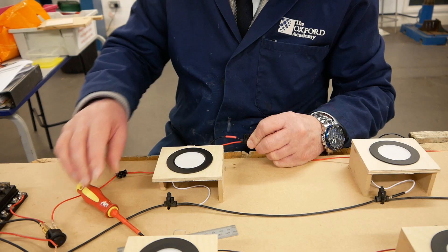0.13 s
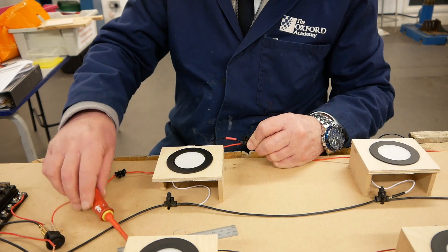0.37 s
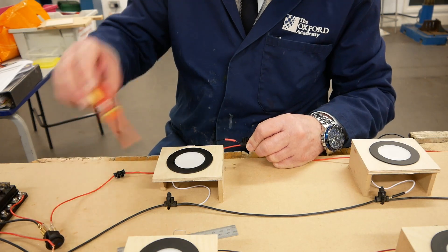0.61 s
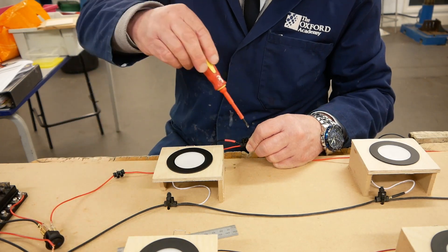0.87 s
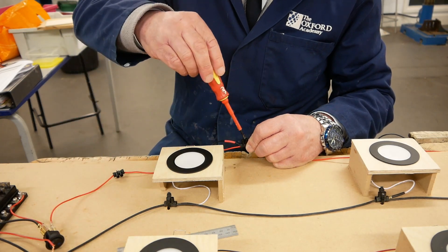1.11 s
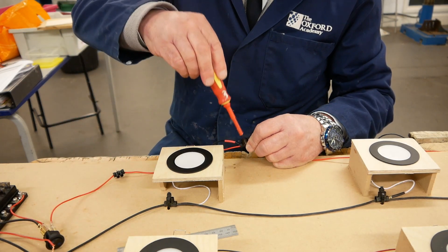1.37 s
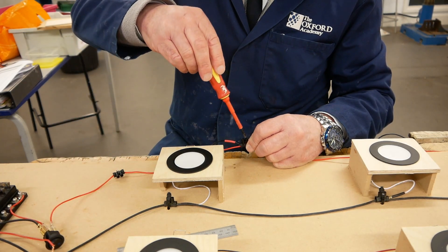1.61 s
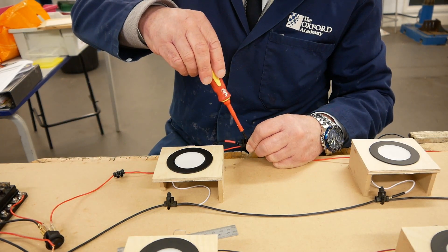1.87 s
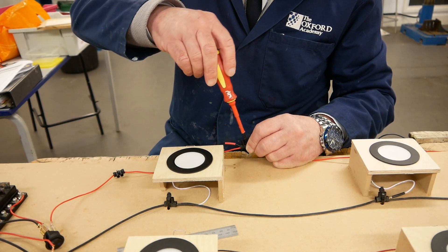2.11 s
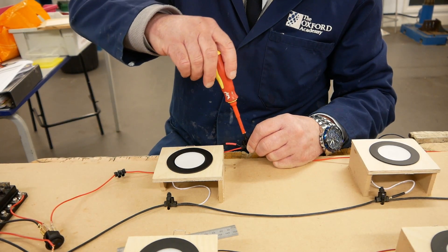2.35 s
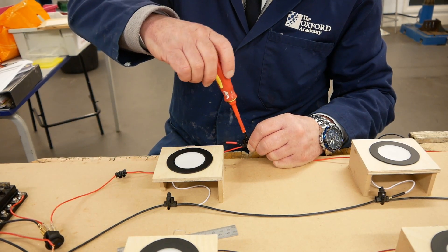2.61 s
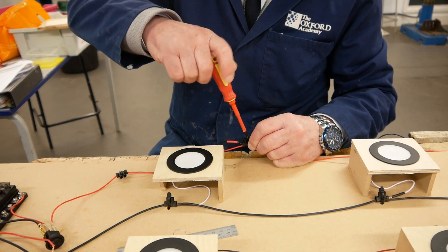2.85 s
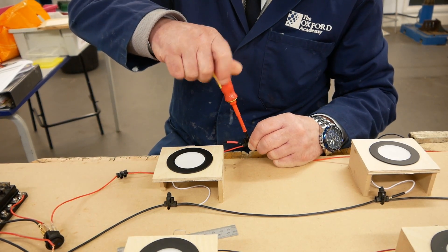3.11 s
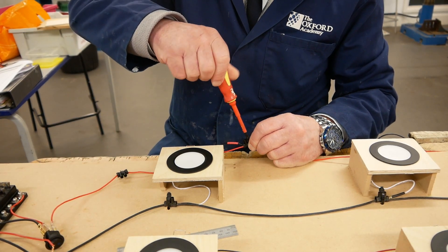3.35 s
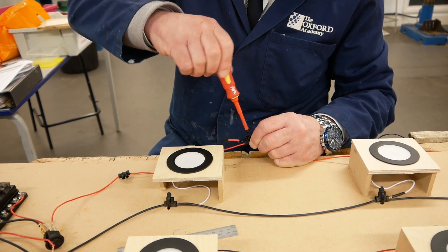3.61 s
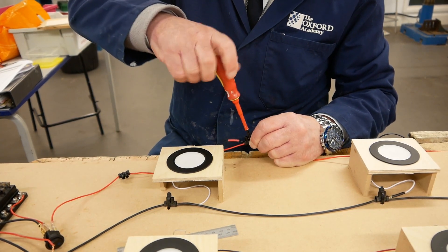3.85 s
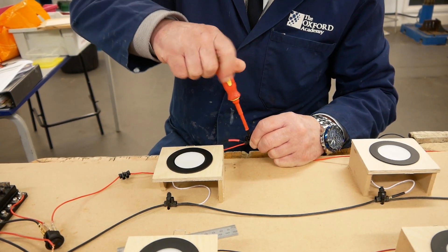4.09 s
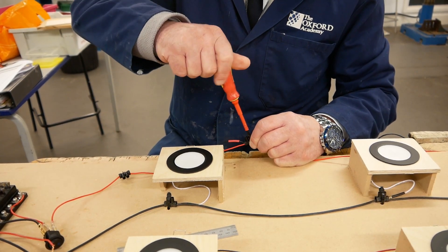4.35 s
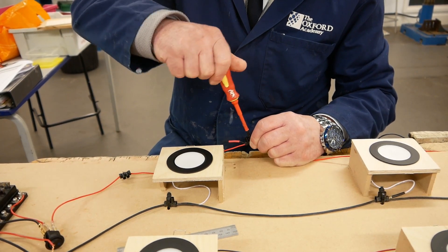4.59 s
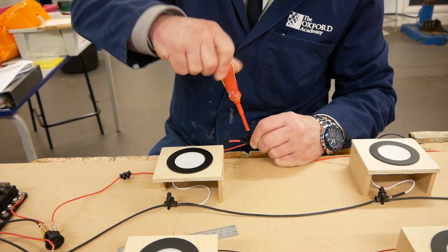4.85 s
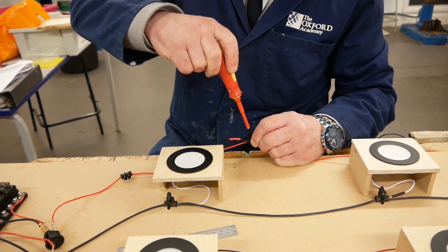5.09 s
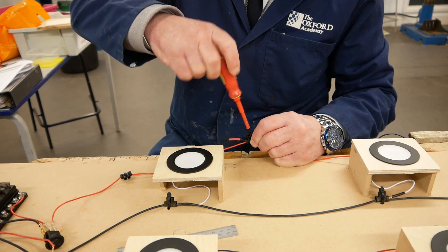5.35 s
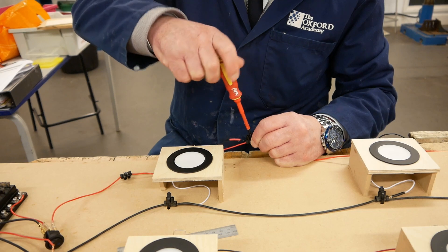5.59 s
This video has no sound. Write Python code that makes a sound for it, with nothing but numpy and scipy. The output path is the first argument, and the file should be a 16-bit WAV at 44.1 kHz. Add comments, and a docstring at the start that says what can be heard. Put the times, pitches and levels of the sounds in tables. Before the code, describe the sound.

A quiet workshop hall, heard close and almost mono: soft ventilation rush, faint low hum and steady fine hiss. At 0 s cloth rustles and a forearm leans lightly on the board. Around 0.33 s a screwdriver drags with a short gritty scrape, gives a sharp plastic knock at 0.39 s and a bright steel-and-plastic clack at 0.47 s with a brief rattle, the loudest events. Sleeves rustle until about 1 s, then fade. A small click comes near 1.15 s and a brighter steel tick at 1.36 s, with tiny touches at 1.85 s. From 2.1 s fingers rub the handle in short dry swishes, with irregular faint clicks and ticks as the screw turns, a duller wooden tap at 3.3 s, and soft clicks through 4-5 s. Slightly clearer plastic clicks land at 5.36 and 5.66 s. Deep, barely audible bench sway swells underneath, strongest near the end. Reflections are short.

```python
"""Screwdriver at a workbench

A screwdriver is dragged off a wooden board and lifted, set into a plastic connector block and turned.
Each contact rings plastic, bench and steel as sets of fading tones; the drag is rough grains shaking them.
Fingers slide on the handle (swells of hiss), sleeves rustle (fluttering noise) and arms make the board murmur.
A quiet hall rushes and hums behind (shaped noise) and the bench sways deeply (very low resonances).
The room adds echoes and a short tail; the sound is nearly mono, with a steady hiss on each side."""
import sys
import numpy as np
from scipy import signal
from scipy.fft import rfft, irfft, next_fast_len
from scipy.io import wavfile
from scipy.ndimage import uniform_filter1d, map_coordinates

SR = 44100
rng = np.random.default_rng(int(sys.argv[2]) if len(sys.argv) > 2 else 0)


def unload_wav(signal):
    """Save mono or channel-first audio to the path in sys.argv[1] as 16-bit WAV at rate SR, clipped to [-1, 1]."""
    wavfile.write(
        sys.argv[1],
        SR,
        np.round(np.clip(np.atleast_2d(signal).T, -1, 1) * 32767).astype(np.int16),
    )


def voltage_ratio(decibels):
    """Convert decibels (scalar or array-like) to amplitude ratios, 20 dB per decade."""
    exponent = np.asarray(decibels, float) / 20
    return 10 ** exponent


N = 252163  # length in samples

# Touches of the tool. Each row: start in seconds, then levels in dB of plastic, first bench blow, steel tip.
CONTACTS = [(0.0776, -57, -41.5, -64), (0.3863, -17, -39, -30), (0.4364, -30.5, -62, -62),
            (0.4668, -23, -31, -13), (0.8498, -50, -45.5, -66), (1.1472, -39.5, -59, -59),
            (1.3648, -34.5, -50, -20), (1.8432, -40, -61, -58), (1.8509, -44, -62, -56),
            (2.2507, -37.5, -47, -40), (2.3487, -45, -36, -58), (2.4838, -51, -51.5, -69),
            (2.8047, -45, -52.5, -62), (2.8841, -57, -53, -61), (2.9245, -47, -60, -66),
            (3.2116, -40, -67, -80), (3.2474, -44, -50.5, -65), (3.3208, -39, -32, -66),
            (3.3662, -44, -80, -56), (3.5721, -38, -57, -71), (3.7698, -53, -45.5, -67),
            (3.8649, -34.5, -50, -58), (4.1769, -38, -46.5, -58), (4.4667, -33.5, -48.5, -64),
            (4.612, -40, -52, -54), (4.633, -45, -62, -46), (4.8821, -45, -55, -48.5),
            (5.0557, -74, -54.5, -59), (5.1949, -43, -59, -43), (5.3582, -28, -54, -64),
            (5.48, -41, -62, -62), (5.5307, -44, -62, -62), (5.6555, -29, -54, -68)]
# Fingers sliding on the handle. Each row: loudest moment in seconds, time from there to 28 dB down
# in seconds, hiss level in dB, level of the duller rub in dB over the hiss.
SLIDES = [(2.143, 0.045, -76.5, 11), (2.246, 0.0058, -69.5, 21), (2.761, 0.076, -70, 9.5),
          (2.824, 0.03, -75.5, 17), (2.897, 0.018, -63.5, -1), (2.947, 0.02, -70, 2.5),
          (3.088, 0.041, -71, 12), (3.2, 0.018, -67, -1), (3.238, 0.021, -69, -4),
          (3.467, 0.022, -66.5, -11), (3.868, 0.027, -63.5, -16), (4.072, 0.052, -73, 7.0),
          (4.173, 0.028, -66, 5.0), (4.377, 0.029, -59, 0.5), (4.465, 0.03, -72, 6),
          (4.619, 0.051, -71, 13.5), (4.681, 0.045, -67.5, 2), (4.774, 0.044, -68, 7.5),
          (4.94, 0.049, -76, 14.5), (5.061, 0.025, -65, 4), (5.148, 0.018, -73, 3), (5.25, 0.048, -63.5, 6),
          (5.351, 0.026, -63, -1), (5.537, 0.046, -69.5, 9), (5.645, 0.019, -66.5, 6.5)]
# The handle scraping the board, jerking free, then rattling after its knock. Each row: start in seconds,
# time until the fade in seconds, then levels in dB of board, grit in the handle, thump of the frame.
SCRAPES = [(0.331, 0.062, -46, -48, -67), (0.383, 0.021, -39.5, -43, -49.5),
           (0.467, 0.0069, -39, -62, -56.5)]
# How the wooden board rings. Each row: pitch in Hz, width in Hz, strength in dB.
BENCH_MODES = [(535, 117, -0.5), (708, 52, 2), (852, 68, 2.5), (1109, 102, -2), (1380, 240, -10.5)]
# How the bench legs ring. Each row: pitch in Hz, width in Hz, strength in dB.
FRAME_MODES = [(59.4, 12, 4), (146, 36, 2), (313, 120, -15)]
# How the plastic connector block rings. Each row: pitch in Hz, width in Hz, strength in dB.
BLOCK_MODES = [(1144, 180, 2), (1864, 340, 1.5), (2500, 1270, 5.5), (3530, 400, 1), (4530, 240, -7)]
# How the plastic handle rings. Each row: pitch in Hz, width in Hz, strength in dB.
HANDLE_MODES = [(1880, 1400, -1), (2860, 320, 7), (2900, 360, 0.5), (3600, 1100, 3), (4400, 610, 4),
                (5500, 300, -16), (7040, 280, -25)]
# How the steel tip rings. Each row: pitch in Hz, width in Hz, strength in dB.
TIP_MODES = [(2096, 256, -5.5), (3110, 160, -7.5), (3734, 186, -8), (4700, 930, 9), (6530, 710, 5.5),
             (7820, 200, -15), (8660, 400, -9.5), (11260, 720, -5.5), (12560, 770, -12)]
# Tone colour of skin on plastic. Each row: frequency in Hz, relative level in dB.
SKIN_COLOUR = [(3000, -31), (5000, -1.5), (8000, -9), (11000, -1), (13000, -6), (16000, -28)]
# Tone colour of cloth, also of the dull finger rub. Each row: frequency in Hz, relative level in dB.
CLOTH_COLOUR = [(300, -59), (700, 2), (1100, -3), (1600, -7), (2800, -0.5), (4500, -7.5), (7000, -15),
                (12000, -20.5)]
# How busily the arms move. Each row: time in seconds, cloth level in dB before its flutter.
EFFORT = [(0, -61.5), (.2, -63), (.85, -63.5), (1.2, -68.5), (1.7, -74), (1.95, -90), (2.1, -65.5),
          (2.3, -65.5), (2.7, -72.5), (2.9, -69), (3.3, -65.5), (4.7, -65), (4.92, -66.5), (5.37, -64),
          (5.72, -66)]
# A forearm leans on the board. Each row: loudest moment in seconds, time from there to 28 dB down
# in seconds, level in dB before its wobble.
LEANS = [(0.016, 0.22, -66.5), (0.337, 0.12, -62.5), (0.87, .25, -79), (1.295, 0.37, -73.5),
         (3.202, .2, -69.5), (3.933, 0.32, -66), (5.08, 0.042, -61.5), (5.234, 0.11, -62),
         (5.384, 0.15, -69), (5.68, 0.11, -68)]
# Pushes that sway the bench. Each row: moment the sway peaks in seconds, level there in dB.
PUSHES = [(.74, -59), (1.96, -65), (2.37, -63.5), (2.78, -60), (3.08, -53.5), (3.4, -62), (3.6, -54.5),
          (3.87, -52), (4.14, -57), (4.46, -51.5), (4.97, -53), (5.25, -54), (5.66, -45)]
# Tone colour of the hall's air. Each row: frequency in Hz, relative level in dB.
HALL_COLOUR = [(15, -33), (30, -1), (70, -4.5), (150, -3), (300, -8), (450, -8.5), (800, -4), (1100, -9.5),
               (1500, -18.5), (3000, -20.5), (6000, -31), (16000, -33)]
# Steady hums of the hall. Each row: pitch in Hz, level in dB, width of each of two resonances in Hz.
HUMS = [(68.1, -74.5, 3.7), (306.7, -75, 14.6), (13700, -106, 6.6)]
# Echoes off near surfaces. Each row: delay in seconds, level in dB before absorption.
ECHOES = [(.0012, -19.5), (.0028, -16), (0.0091, -12), (.017, -24)]
# How long the room's tail lasts. Each row: frequency in Hz, time to fall by 60 dB in seconds.
REVERB_TIME = [(200, 0.29), (1000, 0.17), (4000, 0.22), (12000, 0.11)]
# What the walls give back. Each row: frequency in Hz, gain in dB.
WALL_GAIN = [(300, 2), (4000, -5.5), (7000, -16.5), (14000, -9)]
# Side smear: a faint noisy left-right difference that follows the sound's level.
# Each row: frequency in Hz, side level over the middle in dB.
SIDE_SMEAR_DB = [(20, -41), (300, -34), (700, -33.5), (2000, -27), (6000, -25), (16000, -22)]
# Tone colour of the steady hiss. Each row: frequency in Hz, relative level in dB.
HISS_COLOUR = [(10, -11), (200, -4.5), (1300, -9), (2400, -8.5), (16000, -10.5)]

LIFTED_S = 0.5  # contacts before this ring the handle, later ones the block
BOUNCE_S, BOUNCE_LOSS_DB = 0.013, 7.5  # the bench blow repeats in small hops: average gap, loss per hop
SCATTER_DB = 1.5  # how much the strength of each mode varies from blow to blow
TURNING_S, FAINT_PER_S, FAINT_DB = 2.7, 5, -57  # faint ticks: first moment, density, base level
SCRAPE_ATTACK_S, WOOD_FADE_DB_PER_S, GRIT_FADE_DB_PER_S = 0.0049, 447, 598
GRIT_GROWS_DB_PER_S = 200  # while the first scrape gathers speed
BOARD_DB, BOARD_FOLLOWS = -73.5, 0.27  # murmur at mean effort before its wobble; dB per dB of effort
SWAY_GROWS_DB_PER_S, SWAY_DIES_DB_PER_S = 37, 54
TOP_HZ = 15800  # nothing above this is kept


def unit(x):
    """Scale to an average (rms) level of 1."""
    return x / np.sqrt(np.mean(x ** 2) + 1e-20)


def along(points, hz):
    """Read (Hz, value) points at any frequency, on a log axis."""
    point_hz, value = np.transpose(points)
    return np.interp(np.log(hz + 1), np.log(point_hz + 1), value)


def wobble(rate):
    """A smooth random curve with this many random points a second."""
    points = rng.standard_normal(int(N * rate / SR) + 4)
    return map_coordinates(points, [np.arange(N) * rate / SR])


def filtered(x, response):
    """Multiply the spectrum of x by a response, given as a function of frequency."""
    size = next_fast_len(N + SR // 2)
    hz = np.fft.rfftfreq(size, 1 / SR)
    return irfft(rfft(x, size) * response(hz), size)[..., :N]


def coloured(x, colour):
    """Give x a tone colour, at rms 1."""
    return unit(filtered(x, lambda hz: voltage_ratio(along(colour, hz))))


def noise(colour):
    """Steady noise of one tone colour, at rms 1."""
    return coloured(rng.standard_normal(N), colour)


def resonant(x, modes):
    """Send x through a body's resonances; neighbouring ones push against each other."""
    def response(f):
        total = 0
        for k, (centre, width, db) in enumerate(modes):
            damping = 1j * f * width
            total = total + (-1) ** k * voltage_ratio(db) * damping / (centre ** 2 - f ** 2 + damping)
        return total
    return filtered(x, response)


def grains(per_s, spread_db):
    """Tiny impacts of uneven size at random moments."""
    happens = rng.random(N) < per_s / SR
    return happens * rng.standard_normal(N) * voltage_ratio(spread_db * rng.exponential(size=N))


def patchy(x, depth_db):
    """Random patches of gain over time and frequency, at rms 1."""
    z = signal.stft(x, nperseg=256)[2]
    field = uniform_filter1d(rng.standard_normal(z.shape), size=9, axis=0)
    field = uniform_filter1d(field, size=5, axis=1)
    return unit(signal.istft(z * voltage_ratio(depth_db * unit(field)), nperseg=256)[1][:N])


def swell(s, length, db):
    """A bell-shaped loudness curve, loudest at s."""
    return voltage_ratio(db) * np.exp(-3.2 * ((np.arange(N) / SR - s) / length) ** 2)


def ring(modes, contact_s):
    """One blow on a body: wider modes die faster, strengths and pitches vary a little; peak 1."""
    t = np.arange(SR // 10) / SR
    hz, width, db = np.transpose(modes)[:, :, None]
    luck = rng.standard_normal((2, len(modes), 1))
    sign = (-1) ** np.arange(len(modes))[:, None]  # neighbouring modes push against each other
    strength = sign * voltage_ratio(db + SCATTER_DB * luck[0])
    tones = np.sin(2 * np.pi * hz * (1 + luck[1] / 50) * t)
    x = np.sum(strength * np.exp(-np.pi * width * t) * tones, axis=0)
    x = x * (1 - np.exp(-t / contact_s))  # a longer touch starts more softly
    return x / np.abs(x).max()


def contacts():
    """Every contact rings plastic, bench and steel tip, each at its own level."""
    out = np.zeros(N + SR)
    t = np.arange(SR // 10) / SR
    edge = np.array([1, 3, 2, -2, -3, -1]) / 5  # a smoothed step keeps the middle treble
    for s, plastic_db, bench_db, tip_db in CONTACTS:
        plastic = ring(HANDLE_MODES if s < LIFTED_S else BLOCK_MODES, 0.0001)
        chatter = np.convolve(rng.standard_normal(len(t)), edge)[:len(t)]
        crack = 0.32 * chatter * np.exp(-t / 0.0011)  # hard edges chatter for a moment
        steel = ring(TIP_MODES, 0.00026) + crack
        out[round(s * SR):][:len(t)] += voltage_ratio(plastic_db) * plastic + voltage_ratio(tip_db) * steel
        for hop in range(4):
            moment = s + hop * BOUNCE_S * rng.uniform(0.8, 1.2)
            blow = voltage_ratio(bench_db - hop * BOUNCE_LOSS_DB) * ring(BENCH_MODES, 0.00022)
            out[round(moment * SR):][:len(t)] += blow
    return out[:N]


def faint_ticks():
    """The tip shifts in the screw slot: small uneven ticks at random once the screw turns."""
    blows = grains(FAINT_PER_S, 1.5) * (np.arange(N) > TURNING_S * SR)
    return voltage_ratio(FAINT_DB) * signal.fftconvolve(blows, ring(TIP_MODES, 0.00029))[:N]


def drag():
    """Stick-slip grains shake board, frame, handle and tip; each scrape bites, holds and fades."""
    t = np.arange(N) / SR
    board, grit, thump = np.zeros((3, N))
    for k, (s, hold, board_db, grit_db, thump_db) in enumerate(SCRAPES):
        bite = np.clip((t - s) / SCRAPE_ATTACK_S, 0, 1)
        fading_s = np.clip(t - s - hold, 0, 1)
        board += voltage_ratio(board_db - WOOD_FADE_DB_PER_S * fading_s) * bite
        thump += voltage_ratio(thump_db - WOOD_FADE_DB_PER_S / 2 * fading_s) * bite
        still_growing_s = np.clip(s + hold - t, 0, 1) * (k == 0)  # only the first scrape grows
        grit += voltage_ratio(grit_db - GRIT_GROWS_DB_PER_S * still_growing_s - GRIT_FADE_DB_PER_S * fading_s) * bite
    slips = grains(7000, 2)
    gritty = unit(resonant(slips, HANDLE_MODES)) + 0.48 * unit(resonant(slips, TIP_MODES))
    wood = board * unit(resonant(slips, BENCH_MODES)) + thump * unit(resonant(slips, FRAME_MODES))
    return wood + grit * gritty


def slides():
    """Each slide is a short swell of skin hiss with a duller rub under it."""
    bright, dull = np.zeros((2, N))
    for s, length, hiss_db, dull_db in SLIDES:
        bell = swell(s, length, hiss_db)
        bright += bell
        dull += voltage_ratio(dull_db) * bell
    ridges = coloured(grains(1500, 2.5), SKIN_COLOUR)  # skin ridges catch one by one
    hiss = unit(patchy(noise(SKIN_COLOUR), 2.5) + 0.6 * ridges)
    rub = patchy(noise(CLOTH_COLOUR), 1.0)
    return voltage_ratio(2.0 * wobble(150)) * (bright * hiss + dull * rub)


def rustle():
    """Cloth fibres flutter and crackle, louder as the arms work harder."""
    cloth_db = np.interp(np.arange(N) / SR, *np.transpose(EFFORT))
    crackle = coloured(grains(300, 2.64), CLOTH_COLOUR)
    flutter_db = wobble(12) + wobble(40)
    return voltage_ratio(cloth_db + flutter_db) * (patchy(noise(CLOTH_COLOUR), 2.3) + 0.2 * crackle)


def board_murmur():
    """Arms resting on the board feed it small grains, and it murmurs at its own modes."""
    cloth_db = np.interp(np.arange(N) / SR, *np.transpose(EFFORT))
    resting = voltage_ratio(BOARD_DB + BOARD_FOLLOWS * (cloth_db - cloth_db.mean()))
    leaning = sum(swell(*lean) for lean in LEANS)
    murmur = unit(resonant(grains(1500, 1.23), BENCH_MODES))
    return (resting + leaning) * voltage_ratio(2.16 * wobble(25)) * murmur


def bench_sway():
    """Very low resonances of the bench, growing up to each push and dying after it."""
    modes = [(11.4, 2.4, -4), (18.5, 3.4, -9), (30.3, 2.2, -17.5)]  # Hz, width in Hz, dB
    sway = unit(resonant(rng.standard_normal(N), modes))
    push_s, push_db = np.transpose(PUSHES)[:, :, None]
    since = np.arange(N) / SR - push_s  # negative before the push
    swing_db = push_db + np.minimum(SWAY_GROWS_DB_PER_S * since, -SWAY_DIES_DB_PER_S * since)
    return voltage_ratio(swing_db.max(axis=0)) * sway


def hall():
    """Ventilation rush as shaped noise, with a few hums made by narrow resonances."""
    out = voltage_ratio(-62) * patchy(noise(HALL_COLOUR), 0.54)
    for hz, db, width in HUMS:
        mode = [(hz, width, 0)]
        hum = resonant(resonant(rng.standard_normal(N), mode), mode)
        out = out + voltage_ratio(db) * unit(hum)
    return out


def room(x):
    """Near surfaces echo and a tail of noise follows, each frequency dying at its own speed."""
    early = sum(voltage_ratio(db) * np.pad(x, (round(s * SR), 0))[:N] for s, db in ECHOES)
    hz, t, z = signal.stft(rng.standard_normal(SR // 2), SR, nperseg=256)
    fade = voltage_ratio(-60 * t / along(REVERB_TIME, hz)[:, None])
    tail = signal.istft(z * fade, SR, nperseg=256)[1]
    late = signal.fftconvolve(np.pad(x, (200, 0)), tail / np.linalg.norm(tail))[:N]
    return filtered(early + voltage_ratio(-10.5) * late, lambda hz: voltage_ratio(along(WALL_GAIN, hz)))


def scene():
    """Hands and tool in the room, alike on both sides."""
    near = contacts() + faint_ticks() + drag() + slides()
    mid = near + room(near) + rustle() + board_murmur() + hall() + bench_sway()
    return np.array([mid, mid])


def roll_off(x):
    """The treble ends steeply here."""
    return signal.sosfilt(signal.butter(12, 16520, fs=SR, output="sos"), x)


def record(dry):
    """A faint smeared copy is added left and taken away right, and each side gets its own hiss."""
    t = np.arange(SR // 50) / SR
    smear = rng.standard_normal(len(t)) * np.exp(-t / 0.0041)
    smeared = signal.fftconvolve(dry[0], smear / np.linalg.norm(smear))[:N]
    side = filtered(smeared, lambda hz: voltage_ratio(along(SIDE_SMEAR_DB, hz)))
    hiss = voltage_ratio(-70) * np.array([noise(HISS_COLOUR), noise(HISS_COLOUR)])
    both = dry + side * [[1], [-1]] + hiss
    mix = filtered(both, lambda hz: hz < TOP_HZ)
    return roll_off(mix)


dry = scene()
out = record(dry)
unload_wav(out)
```